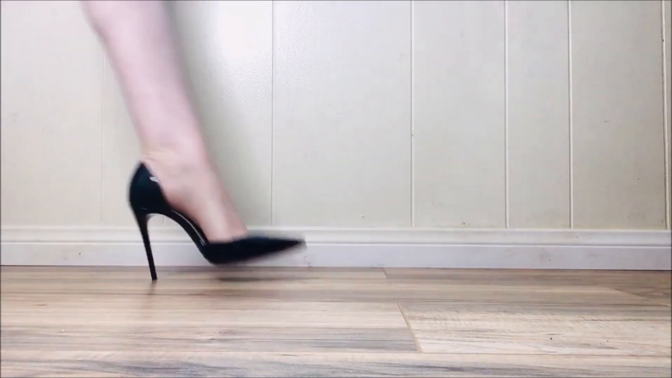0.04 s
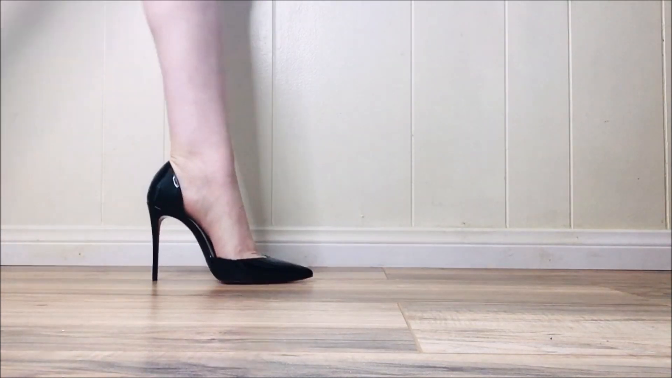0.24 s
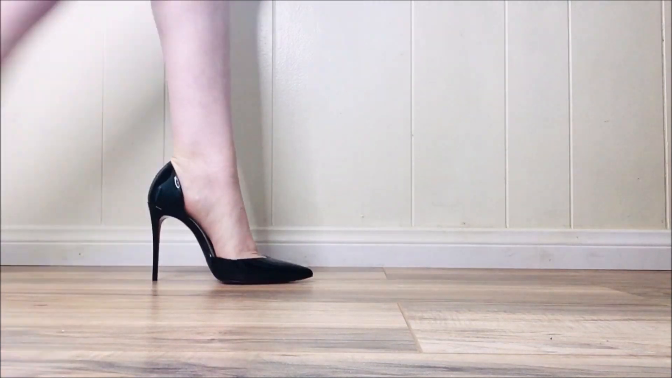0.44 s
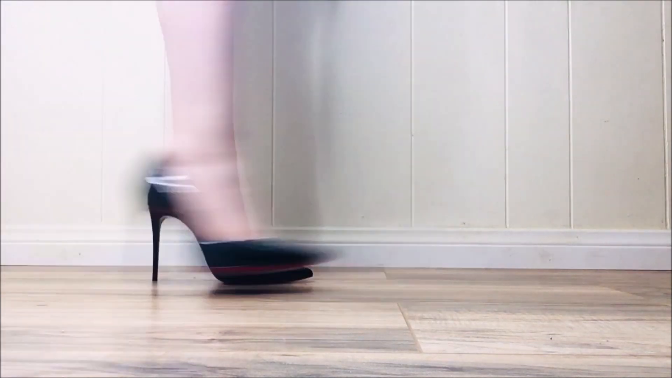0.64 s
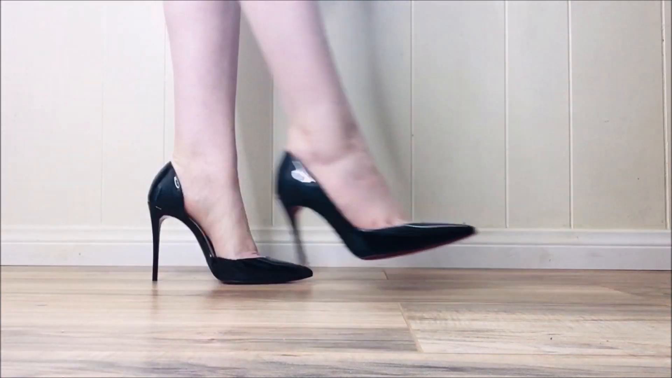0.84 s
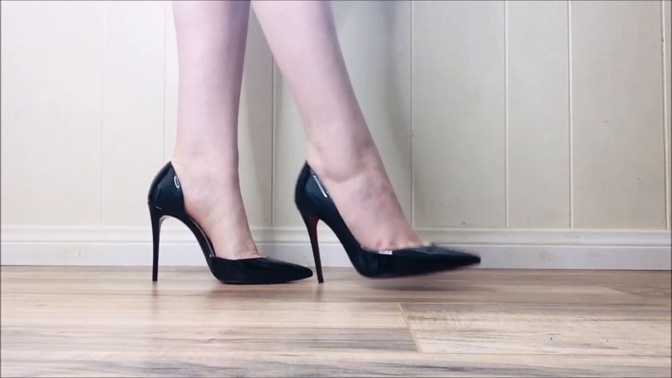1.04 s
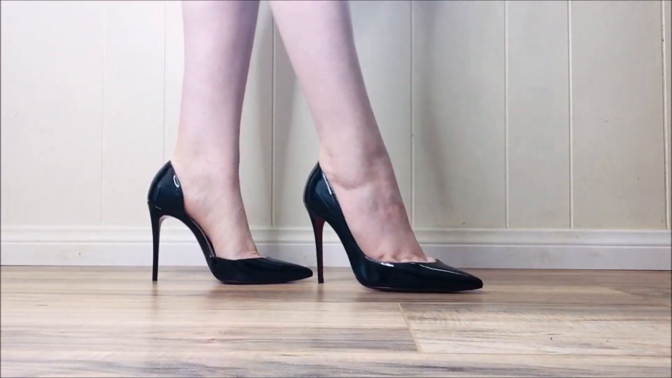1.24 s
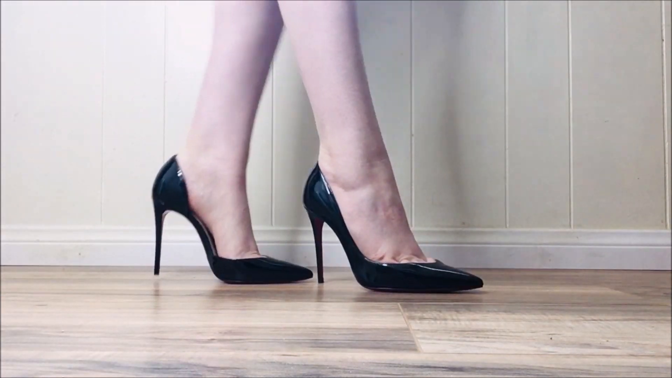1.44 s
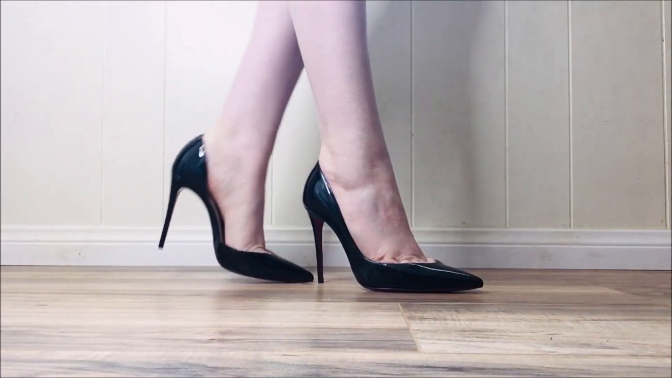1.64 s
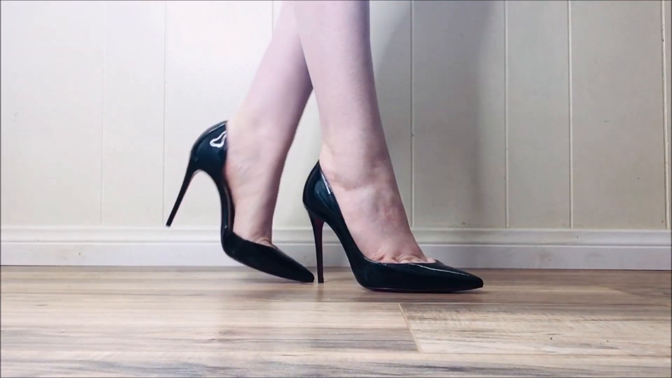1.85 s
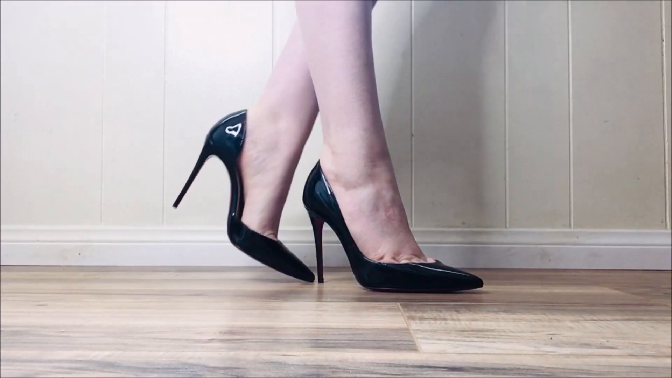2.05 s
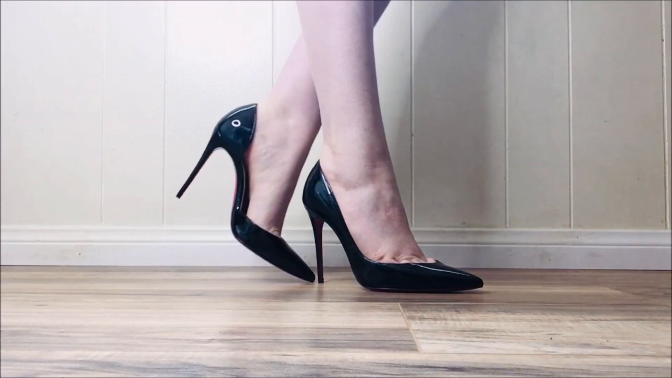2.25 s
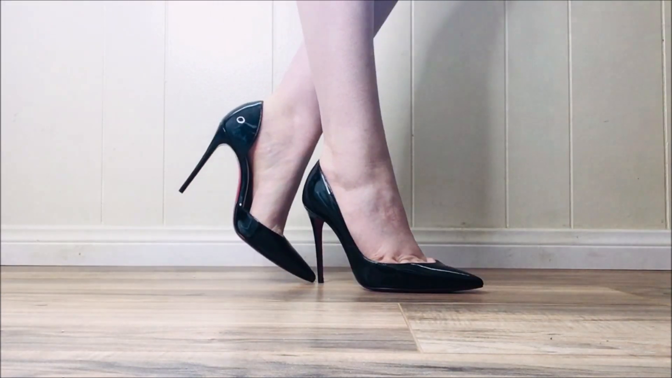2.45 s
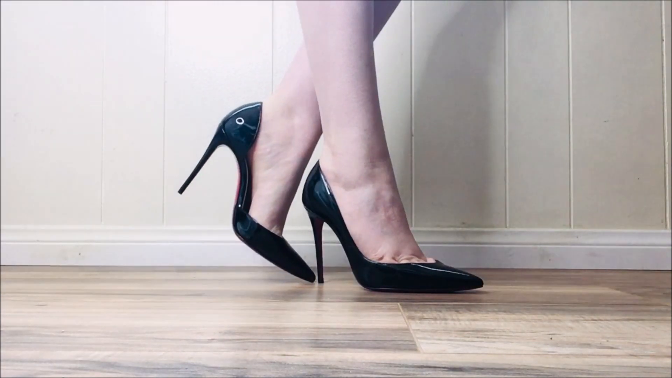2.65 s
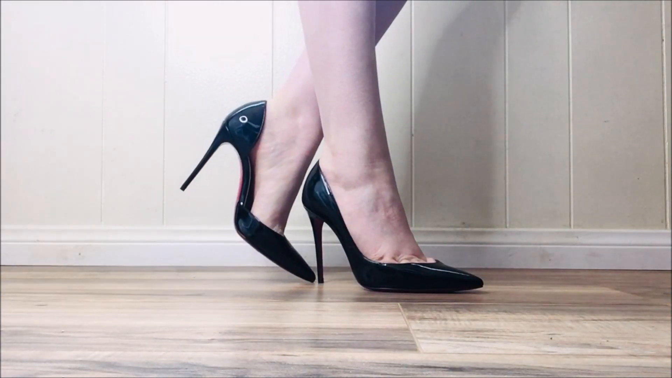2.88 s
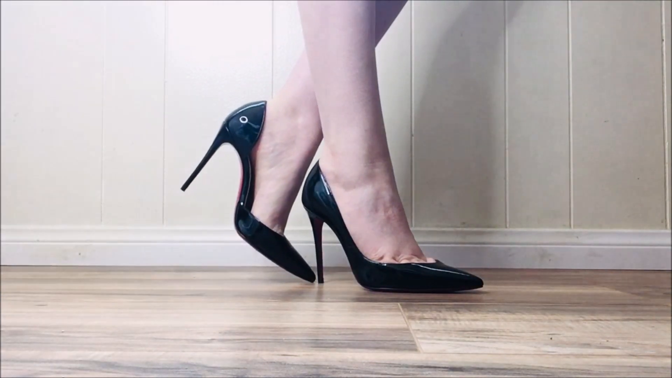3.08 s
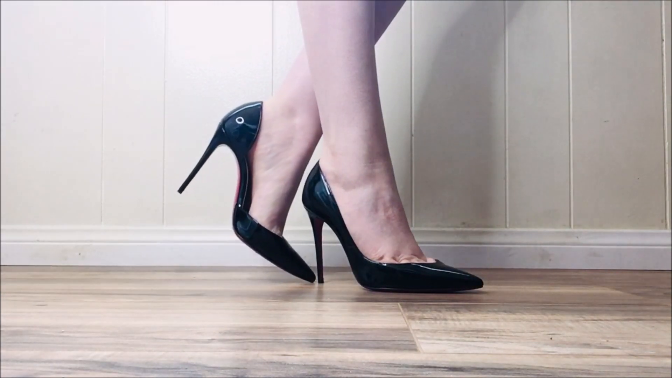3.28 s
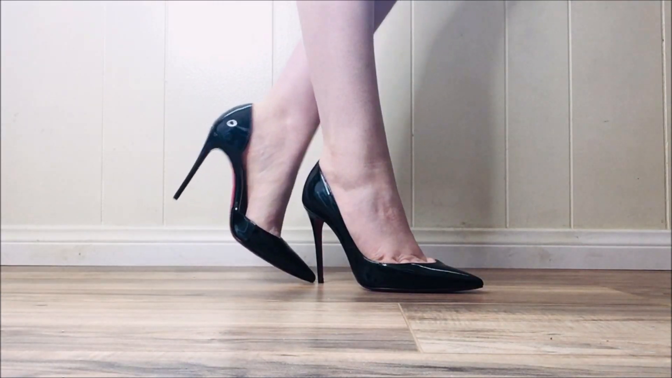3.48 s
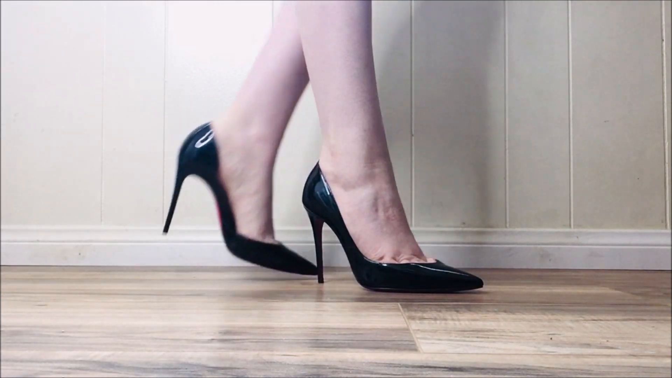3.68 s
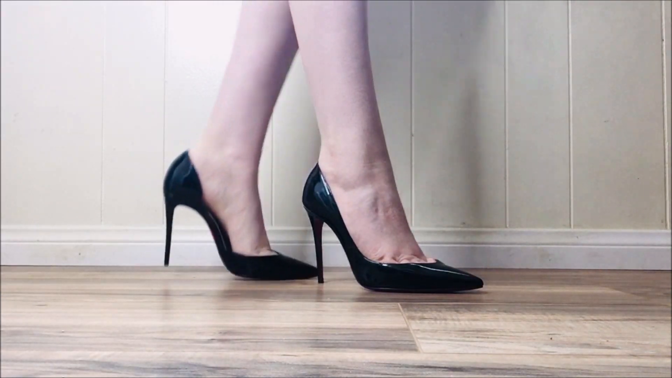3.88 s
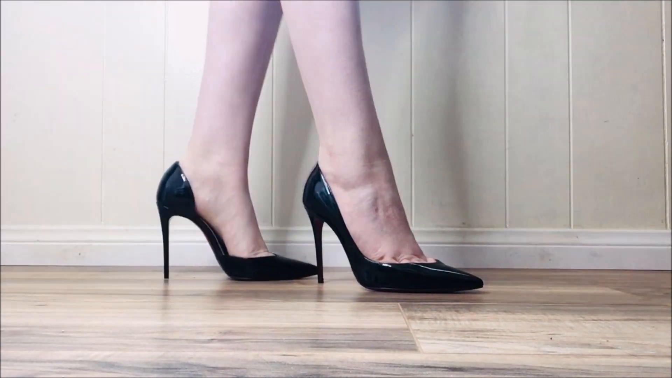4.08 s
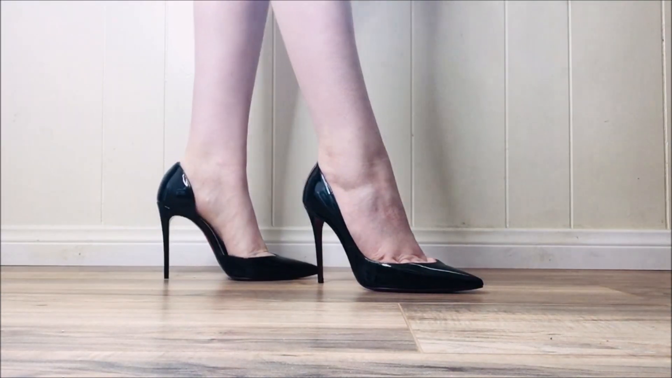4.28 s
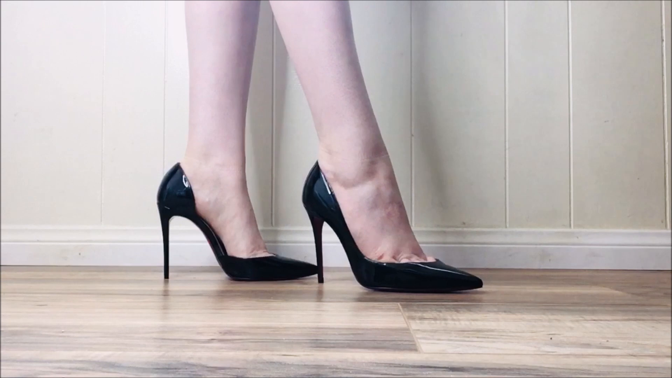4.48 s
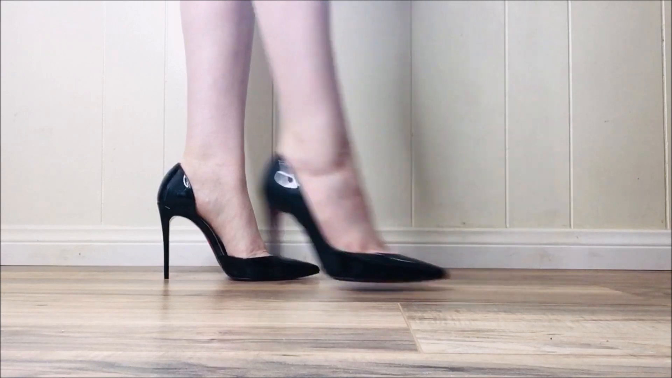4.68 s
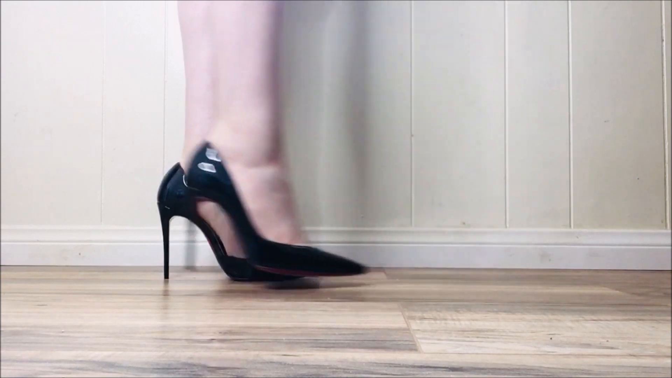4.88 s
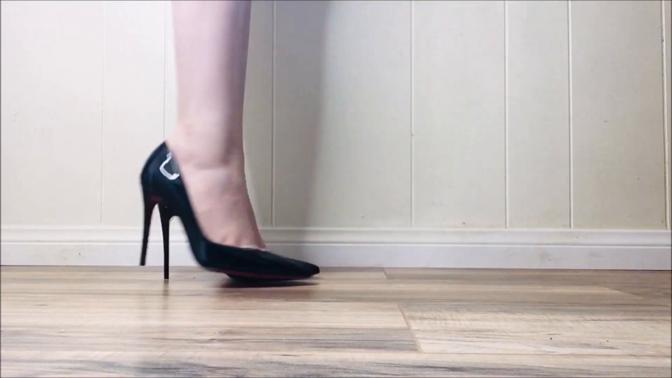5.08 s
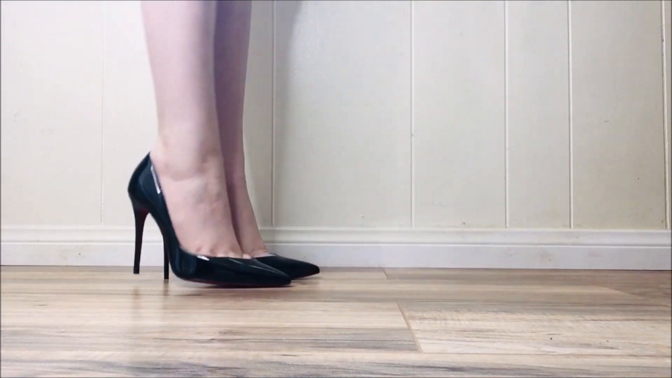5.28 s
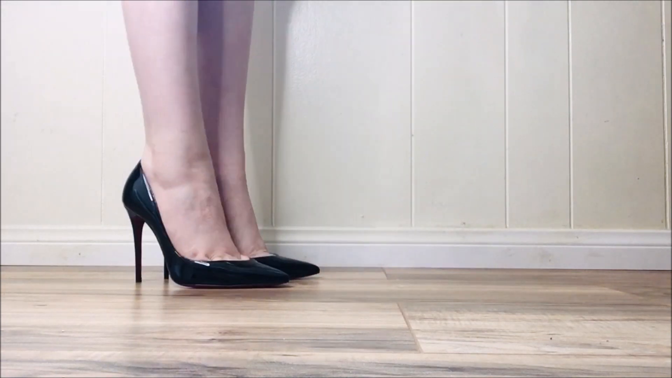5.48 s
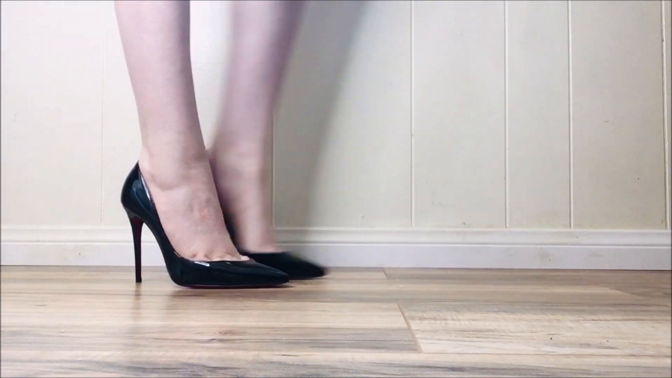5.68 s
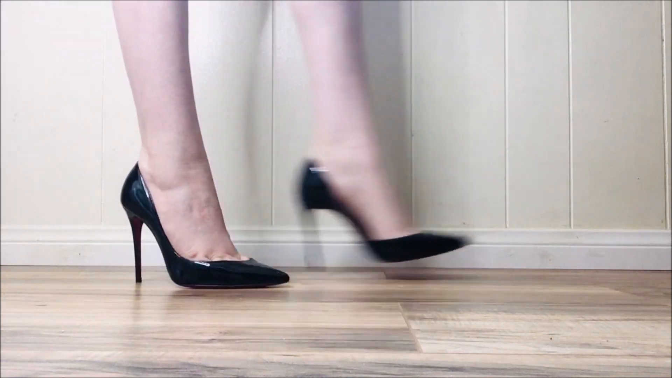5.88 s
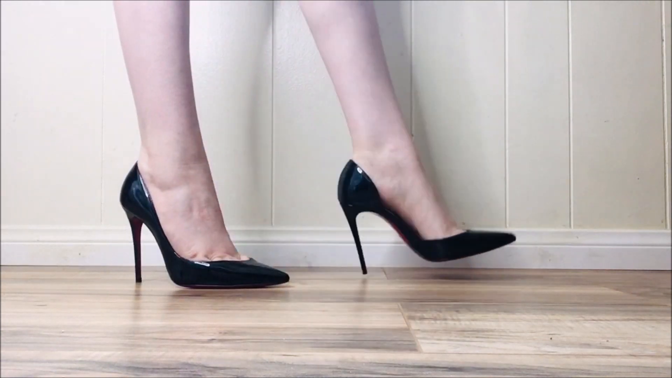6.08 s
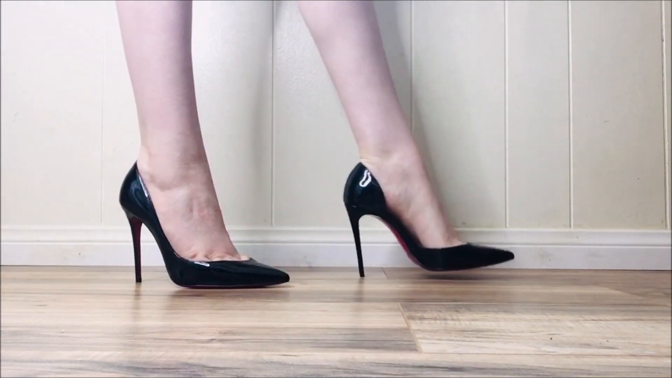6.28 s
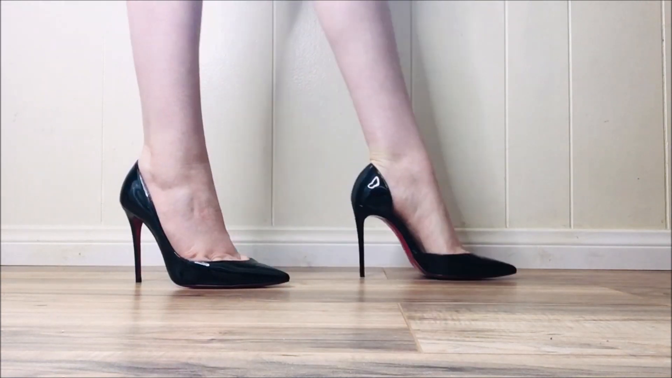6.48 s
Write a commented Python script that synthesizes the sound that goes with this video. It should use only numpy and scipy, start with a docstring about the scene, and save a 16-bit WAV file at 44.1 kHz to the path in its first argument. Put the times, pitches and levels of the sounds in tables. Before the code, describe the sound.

Close, crisp high-heel clacks on wooden planks, a few uneven steps separated by a long near-silent pause, with short indoor reverberation.

```python
"""Stiletto heels on a plank floor

Stiletto heels step about on planks, close to a microphone standing low in a small quiet room.
Each heel or sole blow is a shaped pulse that spreads as a bending wave, treble first and bass last;
decaying modes ring floor and heel, and scattered noise is the rattle between the plank edges.
Shoes tick faintly between steps as tiny snaps inside brief noise scrapes.
Banded noise tails give the reverberation; shaped noise gives the low room rumble and soft hiss."""
import sys
import numpy as np
from scipy import signal
from scipy.fft import rfft, irfft
from scipy.io import wavfile

SR = 44100
rng = np.random.default_rng(int(sys.argv[2]) if len(sys.argv) > 2 else 0)


def wav_record(signal):
    """Record a signal, one row per channel, as 16-bit PCM in the file named by sys.argv[1]."""
    frames = np.transpose(np.atleast_2d(signal))
    bounded = np.clip(frames, -1, 1)
    # unit amplitude maps onto the largest positive 16-bit level
    quanta = np.round(bounded * 32767).astype(np.int16)
    wavfile.write(sys.argv[1], SR, quanta)


N = 287973  # length of the scene in samples

SIZE = 32768  # samples in one sound's spectrum
HZ = np.maximum(np.fft.rfftfreq(SIZE, 1 / SR), 1)
AGE = np.arange(SIZE) / SR  # seconds since the start of one sound

# ring of the floor, before detuning: (f/Hz, level/dB, t60/s)
FLOOR_MODES = [(104.6, -7, 0.2), (138.3, -24, 0.66), (178, -2.5, 0.1), (211.6, -13.5, 0.32),
               (305.8, -15, 0.2), (380, -7, 0.1), (418.4, -27, 0.071), (608, -12, 0.056)]
# ring of the thin heel, before detuning: (f/Hz, level/dB, t60/s)
HEEL_MODES = [(2720, 2, 0.044), (2930, -30, 0.043), (3870, -7, 0.062), (4600, -2, 0.034)]


def undb(db):
    """Decibels to gain."""
    return 10 ** (np.asarray(db) / 20)


def on_log_axis(hz, points_hz, values):
    """Join points by straight lines over log frequency."""
    return np.interp(np.log(hz), np.log(points_hz), values)


def causal(db):
    """Spectrum of the sharpest causal pulse that has these levels (minimum phase, by way of the cepstrum)."""
    cepstrum = irfft(np.log(undb(db)))
    cepstrum[1:SIZE // 2] *= 2
    cepstrum[SIZE // 2 + 1:] = 0
    return np.exp(rfft(cepstrum))


def fade(t60):
    """Exponential decay, 60 dB in t60 seconds."""
    return np.exp(-np.log(1000) * AGE / t60)


def diffuse(t60, build_s):
    """Spectrum of countless echoes, as noise that builds up and dies away with unit energy on average."""
    build_up = (1 - np.exp(-(AGE / build_s) ** 2)) ** 2
    envelope = fade(t60) * build_up
    noise = rng.standard_normal(SIZE)
    return rfft(noise * envelope / np.sqrt(np.sum(envelope ** 2)))


def add(track, s, spectrum):
    """Mix a sound given by its spectrum into the track at time s."""
    start = int(round(s * SR))
    track[start:start + SIZE] += irfft(spectrum)[:N - start]


def heels(floor_db=-2, heel_db=-12):
    """The tip strikes a single point, so a distinct echo returns from the plank edge."""
    # heel tip landings: (t/s, strength/dB, hardness/dB per octave, contact click/dB,
    # pitch of the struck spot f/Hz, lag of the edge echo at 200 Hz/ms, echo share/0-1)
    landings = [(0.11, 29.5, -0.1, -18.5, 148, .4, 0.4), (1.1087, 26.5, -0.66, -31, 138, 1.93, 0.36),
                (3.88, 12, 3, -31, 1440, 2.35, 0.64), (5.324, 12.5, 0.54, -62, 720, 2.44, 0.84),
                (5.421, 4, -2.5, -52, 730, 2.46, 0.8), (6.2459, 16.5, -2, -44, 337, 2.19, 0.41)]
    # body of a blow from the narrow heel: (f/Hz, level/dB)
    narrow_body = [(150, 0), (370, -10), (650, -22), (1300, -30.5)]
    track = np.zeros(N)
    for s, strength_db, hardness_db, click_db, spot_hz, edge_ms, edge_share in landings:
        ring = undb(floor_db) * ringing(FLOOR_MODES) + undb(heel_db) * ringing(HEEL_MODES)
        colour_db = contact(narrow_body, strength_db, hardness_db, click_db) + spot(spot_hz)
        blow = strike(colour_db, ring)
        add(track, s, blow * (1 + edge_share * edge_echo(edge_ms)))
    return track


def soles(floor_db=-1, heel_db=-8):
    """The sole slaps a broad patch: a fuller knock with no distinct edge echo."""
    # the sole comes down after the heel, or pats the floor as the weight shifts:
    # (t/s, strength/dB, hardness/dB per octave, contact click/dB, pitch of the struck spot f/Hz)
    slaps = [(0.2289, 30, -2, -8, 886), (1.2783, 16, 0.5, -29.5, 550), (3.607, -9, -4, -47, 250),
             (4.057, -1.5, -.3, -53, 330), (4.082, 31, -2.5, -31, 1030), (4.5874, 3.5, 0.5, -32.5, 2930),
             (5.495, 22, 0.53, -33, 290), (5.656, 0, -3.5, -38.5, 534), (5.814, -6, -5.5, -48, 247),
             (6.1021, -6.9, 3.3, -38, 203)]
    # body of a blow from the flat sole: (f/Hz, level/dB)
    flat_body = [(150, 0), (370, -11), (650, -16), (1300, -34)]
    track = np.zeros(N)
    for s, strength_db, hardness_db, click_db, spot_hz in slaps:
        ring = undb(floor_db) * ringing(FLOOR_MODES) + undb(heel_db) * ringing(HEEL_MODES)
        colour_db = contact(flat_body, strength_db, hardness_db, click_db) + spot(spot_hz)
        add(track, s, strike(colour_db, ring))
    return track


def strike(colour_db, ring, level_db=-2, rattle_db=-12, rattle_t60=0.031, wall_s=0.012, wall_db=-16, scatter_hz=190):
    """One blow runs along the plank as a bending wave, rings floor and heel, and rattles between the joints."""
    # colour common to all blows: (f/Hz, level/dB)
    plank_colour = [(25, -55.5), (45, -20.5), (70, -20), (100, -3.5), (155, 0), (255, -3), (370, 1.5),
                    (1000, -1.5), (1500, 2), (2000, -2.5), (2700, -2), (4400, 1.5), (7000, -13),
                    (16000, -61)]
    travel_ms = 5.78  # scale of the 200 Hz wave's lag, before the front's own lag is taken off
    plank_db = on_log_axis(HZ, *np.transpose(plank_colour))
    blow = causal(level_db + plank_db + colour_db) * grit()
    wall = undb(wall_db) * np.exp(-2j * np.pi * HZ * wall_s)  # first reflection off a wall
    rattle = undb(rattle_db) * diffuse(rattle_t60, build_s=0.0024)  # waves scattered by the plank joints
    short_waves = 1j * HZ / (scatter_hz + 1j * HZ)  # long waves pass obstacles unscattered
    return blow * bending(travel_ms) * (1 + ring + short_waves * (rattle + wall))


def contact(body, strength_db, hardness_db, click_db):
    """Levels of one blow: the harder the contact, the more its body tilts to the treble; a click sits on top."""
    click_hz = 4170  # from here up only the contact click is left
    hz, shape_db = np.transpose(body)
    body_db = strength_db + shape_db + hardness_db * np.log2(hz / hz[0])
    return on_log_axis(HZ, [*hz, click_hz], [*body_db, click_db])


def spot(hz):
    """Each spot of plank or shoe gives most at its own pitch: a broad hump in dB."""
    height_db, half_width_octaves = 7.5, 0.25
    return height_db / (1 + (np.log2(HZ / hz) / half_width_octaves) ** 2)


def grit(grit_hz=2400, grit_t60=0.0099, rasp_db=-3, clean_db=-2):
    """The tip grinds for a moment as it lands: the treble is a click with a short rasp, the bass a clean push."""
    treble = 1 / (1 + (grit_hz / HZ) ** 2)
    rasp = undb(rasp_db) * diffuse(grit_t60, build_s=0.00069)
    return 1 - treble + treble * (undb(clean_db) + rasp)


def bending(lag_ms, front_hz=7000):
    """Travel along a plank: speed grows with the root of frequency, so a click becomes a falling chirp."""
    lag_s = lag_ms / 1000 * np.sqrt(200 / np.maximum(HZ, 50))
    # count lags from the front, which arrives at once with all above it
    lag_s = np.maximum(lag_s - np.interp(front_hz, HZ, lag_s), 0)
    return np.exp(-2j * np.pi * np.cumsum(lag_s) * SR / SIZE)  # phase is the summed lag


def edge_echo(lag_ms):
    """The same bending wave after a detour to the plank's edge; it cuts hollows into the knock."""
    return np.exp(-4j * np.pi * lag_ms / 1000 * np.sqrt(200 * HZ))


def ringing(modes):
    """Spectrum of decaying modes, slightly detuned; each one's dB is its share of a blow about an octave wide."""
    mode_spread = 0.038  # the modes ring a little higher or lower from blow to blow
    ring = 0
    for (hz, db, t60), detune in zip(modes, rng.standard_normal(len(modes))):
        mode_hz = hz * (1 + mode_spread * detune)
        mode = np.cos(2 * np.pi * mode_hz * AGE) * fade(t60)
        ring = ring + undb(db) * mode * np.sqrt(hz / SR / np.sum(mode ** 2))
    return rfft(ring)


def ticks(snap_db=-11, swell_share=0.25, lag_ms=3):
    """Flexing leather and shifting soles: a tiny snap inside a brief scrape, strongest near its own pitch."""
    # small ticks and scuffs: (t/s, level/dB, pitch f/Hz, slope above the pitch/dB per octave, length/s)
    scuffs = [(0.117, -23.5, 1390, -8, 0.0056), (0.195, -37, 4000, -1, 0.064),
              (0.304, -31.5, 1540, -5, 0.015), (0.403, -32, 1240, -2.5, 0.0073),
              (1.338, -13, 323, -12, 0.02), (1.399, -13.5, 302, -12.5, 0.079),
              (1.58, -30.5, 644, -5, 0.028), (1.6893, -28, 1000, -4.5, 0.0071),
              (1.765, -31.5, 990, -5, 0.0053), (2.193, -38.5, 2000, 0, 0.027),
              (2.324, -27.5, 1230, -5.5, 0.012), (3.119, -19, 600, -5.5, 0.0055),
              (4.054, -33, 5680, -8, .011), (4.16, -33, 1220, -6, 0.011), (4.584, -23.5, 606, -5, .025),
              (5.654, -33.5, 550, -1.7, 0.032), (6.351, -26.5, 440, -5, 0.0078)]
    top_hz = 11800  # ticks die out above this
    bass_slope_db = 4.5  # fall per octave below a tick's pitch
    track = np.zeros(N)
    top_db = -10 * np.log10(1 + (HZ / top_hz) ** 14)
    for s, level_db, pitch_hz, slope_db, length_s in scuffs:
        octaves = np.log2(HZ / pitch_hz)
        flanks_db = octaves * np.where(octaves > 0, slope_db, bass_slope_db)
        colour = causal(level_db + flanks_db + spot(pitch_hz) + top_db)
        scrape = diffuse(2 * length_s, build_s=swell_share * length_s)
        add(track, s, colour * bending(lag_ms) * (undb(snap_db) + scrape))
    return track


def room(x):
    """Reverberation in overlapping bands of decaying noise, each with its own level and decay."""
    # reverberation bands: (centre f/Hz, level/dB re the direct sound, t60/s)
    bands = [(74.4, -31.5, 0.95), (196, -10, 0.29), (480, -21, 0.23), (1170, -7, 0.18), (3220, -6.5, 0.16),
             (9900, -8, 0.22)]
    centres = np.transpose(bands)[0]
    response = 0
    for (hz, db, t60), band in zip(bands, np.eye(len(bands))):
        band_gain = np.sqrt(on_log_axis(HZ, centres, band))  # neighbours cross-fade in power
        response = response + undb(db) * band_gain * diffuse(t60, build_s=0.0013)
    return signal.fftconvolve(x, irfft(response)[:SIZE * 3 // 4])[:N]


def still_room():
    """Low rumble of the building under an even microphone hiss, both from one shaped noise."""
    # colour of the still room, relative: (f/Hz, density level/dB)
    quiet_colour = [(20, -37), (30, -24), (43, -9), (62, 2.5), (86, -7), (119, 1), (200, -12), (260, -14),
                    (480, -28), (970, -32), (1700, -32.5), (6700, -37), (11000, -43), (15500, -50.5)]
    quiet_db = -59.5  # RMS level re full scale, before the top is cut
    hz = np.maximum(np.fft.rfftfreq(N, 1 / SR), 1)
    colour = undb(on_log_axis(hz, *np.transpose(quiet_colour)))
    noise = irfft(rfft(rng.standard_normal(N)) * colour, N)
    return noise * undb(quiet_db) / np.std(noise)


def scene():
    """Heels, soles and ticks with their reverberation in the still room."""
    shoes = heels() + soles() + ticks()
    return (shoes + room(shoes) + still_room())[None]


def record(dry):
    """The recorder cuts the top with a steep low-pass."""
    top_hz = 15300
    low_pass = signal.ellip(8, .2, 70, top_hz, fs=SR, output="sos")
    return signal.sosfilt(low_pass, dry)


dry = scene()
out = record(dry)
wav_record(out)
```